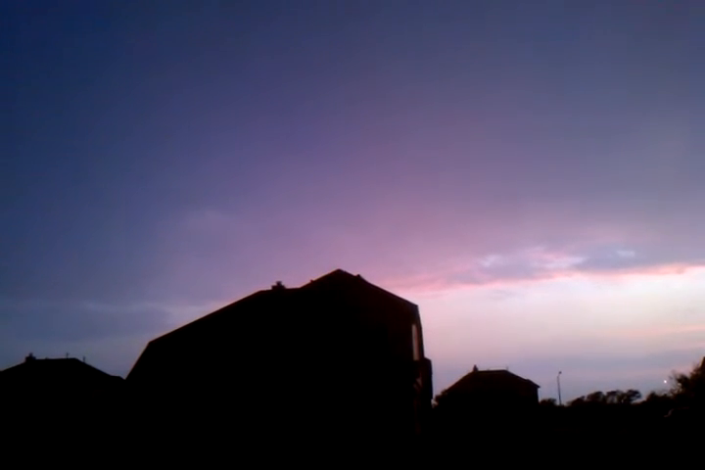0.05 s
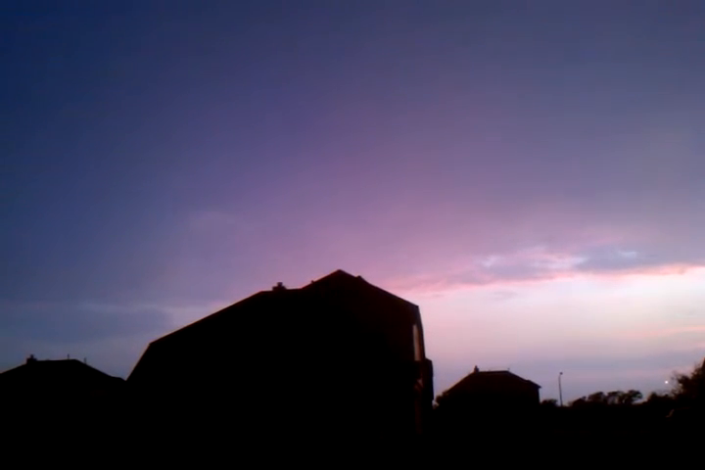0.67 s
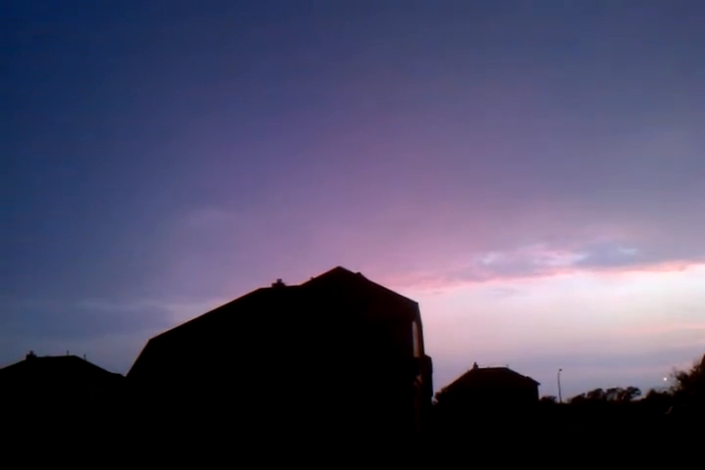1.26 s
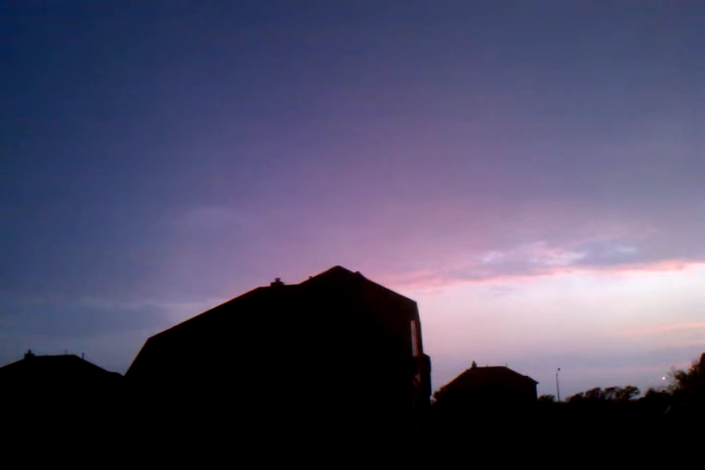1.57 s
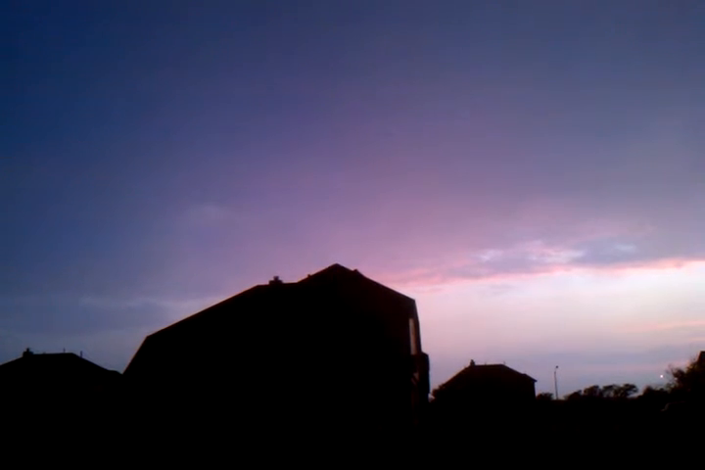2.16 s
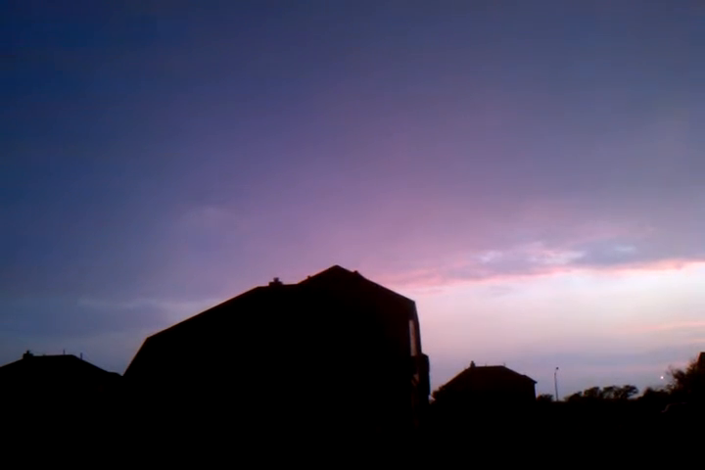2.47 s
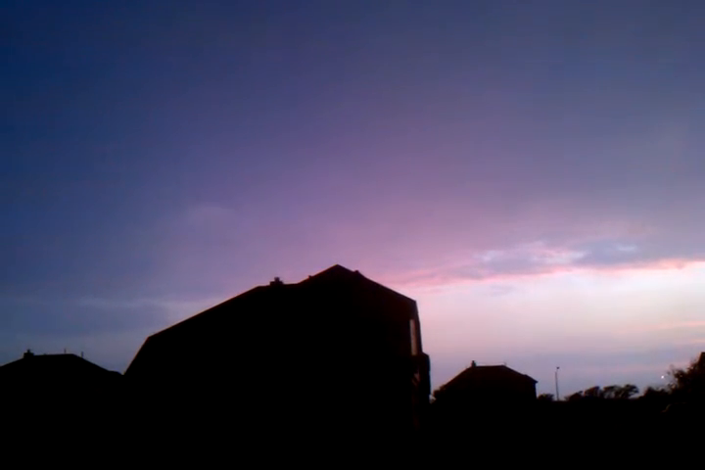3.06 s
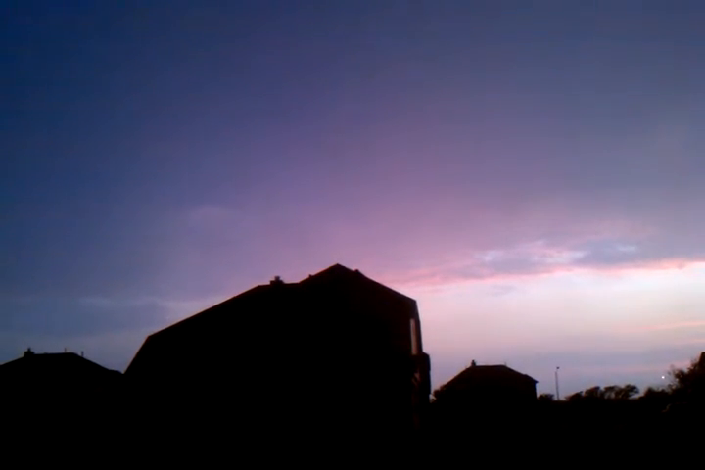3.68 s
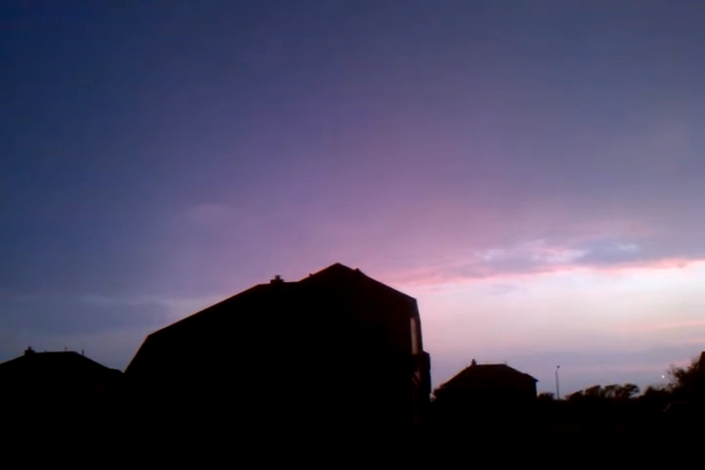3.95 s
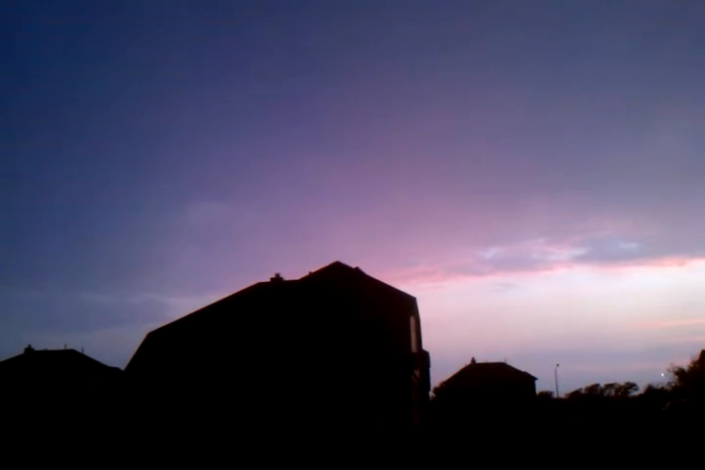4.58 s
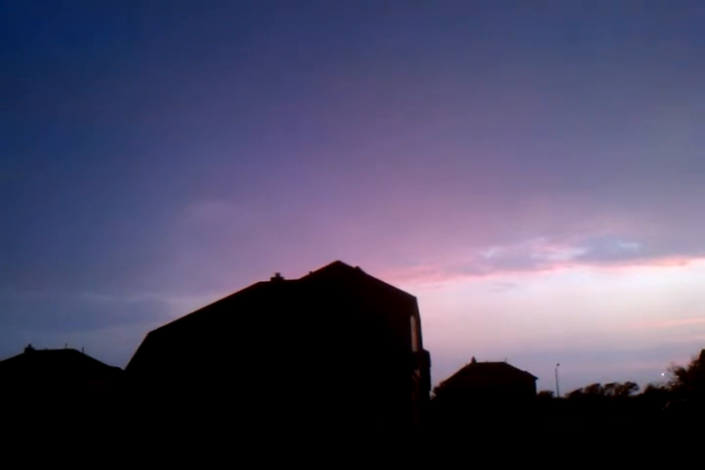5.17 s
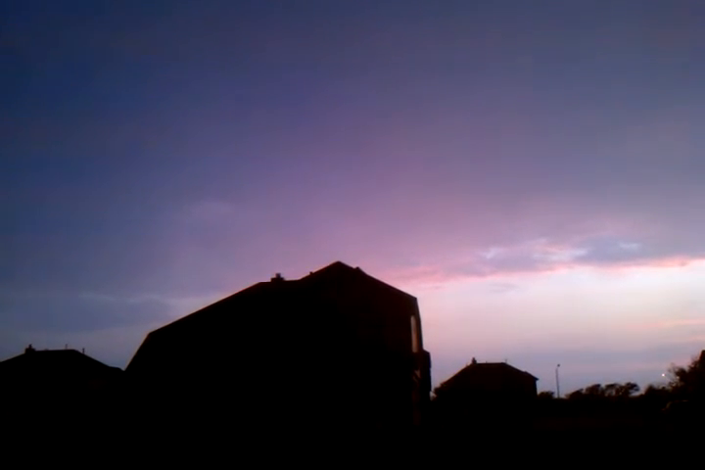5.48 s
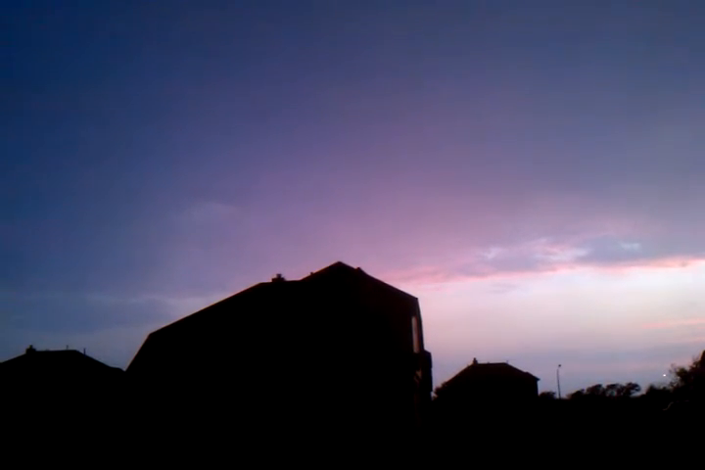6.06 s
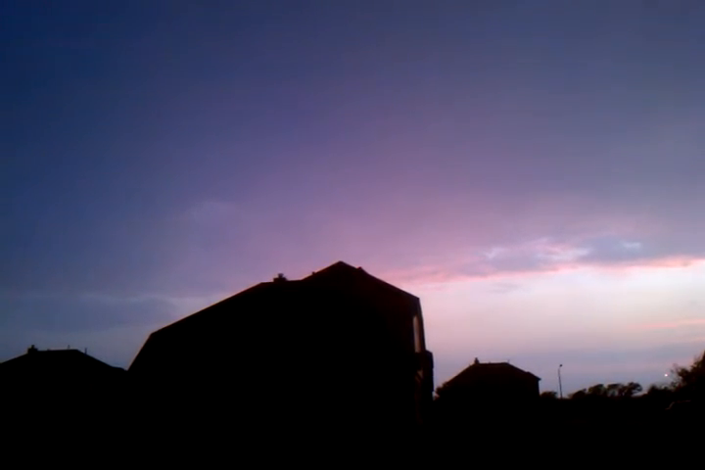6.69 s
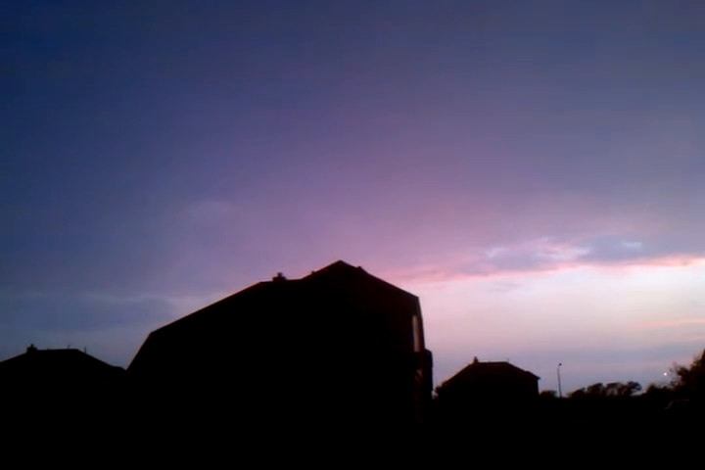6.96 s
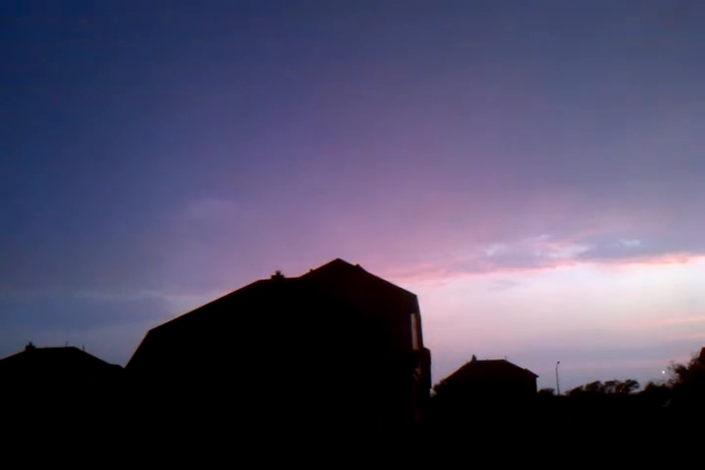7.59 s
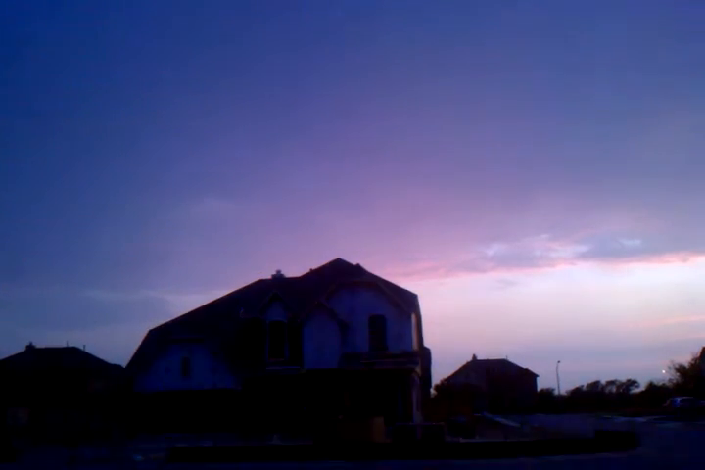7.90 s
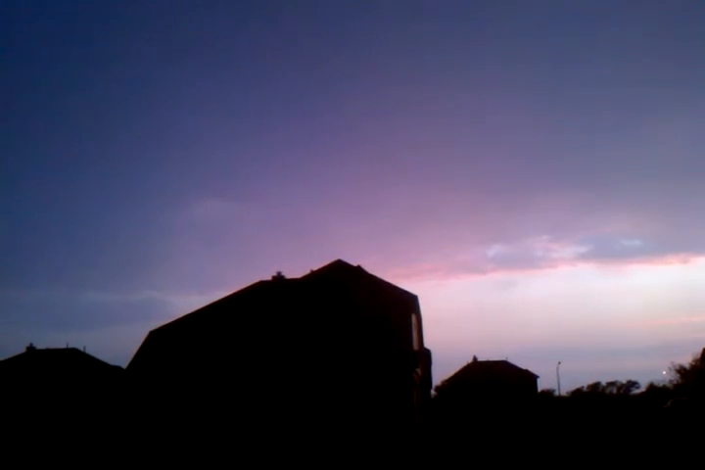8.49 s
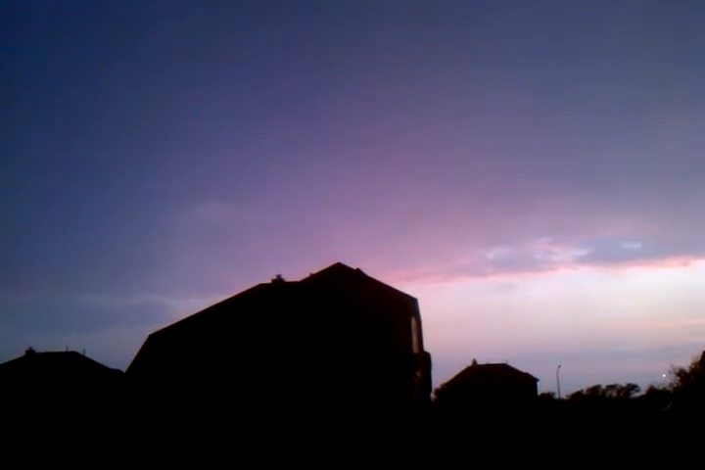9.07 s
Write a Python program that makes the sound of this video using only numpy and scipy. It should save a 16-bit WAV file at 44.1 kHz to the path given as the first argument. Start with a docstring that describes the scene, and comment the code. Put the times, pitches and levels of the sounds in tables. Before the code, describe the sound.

On one microphone beside a house, gentle rain hisses and patters above a low steady hum. Early on, a soft thump is followed by the sharp, briefly ringing smack of a big drop close by, the loudest sound. A low roll of far thunder follows and slowly dies away. The rain carries on, and toward the end distant traffic grows a little, with a short thin whine.

```python
"""Light rain at dusk, on one microphone at a house. From the start, far rain merges into a soft wash
and small drops tick nearby, over a steady hum and a low murmur of air and roads. Just after a soft
bump, at 2 s, a heavy drop smacks a surface close to the microphone and the walls answer. From 3.25 s
far thunder rolls once. Near the end the wash swells, with a brief faint whine, as of distant traffic."""
import sys
import numpy as np
from scipy import signal
from scipy.fft import rfft, irfft, next_fast_len
from scipy.io import wavfile
from scipy.ndimage import uniform_filter1d, map_coordinates

SR = 44100
rng = np.random.default_rng(int(sys.argv[2]) if len(sys.argv) > 2 else 0)


def output_pcm(signal):
    """Save a mono or channel-first signal as 16-bit PCM at the path in sys.argv[1].

    Samples are clipped to [-1, 1] before scaling.
    """
    pcm = np.clip(np.atleast_2d(signal).T, -1, 1) * 32767
    wavfile.write(sys.argv[1], SR, np.round(pcm).astype(np.int16))


N = 411894

# Spectra of the far rain, the near rain and the outdoor murmur: frequency_hz, level_db
WASH_SPECTRUM = [(200, -12), (350, 1), (560, -0.5), (800, 2), (1100, 1.5), (1600, 1), (2100, -2.5),
                 (2700, -9), (3600, -14), (7500, -22.5)]
PATTER_SPECTRUM = [(1000, -24.5), (2400, -4.5), (3300, -5.5), (3900, -1), (4600, 1.5), (5300, -0.5),
                   (6000, -2.5), (7200, -5.5), (7600, -22)]
MURMUR_SPECTRUM = [(20, 2.5), (30, -3.5), (42, -3.5), (70, 2), (95, -3), (120, -1.5), (150, -2), (195, -3),
                   (280, -0.5), (380, -13), (600, -26), (1500, -60)]
# Lines of the steady hum: pitch_hz, level_db, unsteadiness (0-1)
HUM_LINES = [(58.8, -48.8, .13), (114.3, -67, .4), (150, -67, .4), (173.5, -64.5, .45), (229, -68, .3),
             (239.9, -55.5, .06), (470, -64.5, .3), (479, -68, .4), (1411, -70, .5), (2115, -73, .4),
             (2470, -72, .2), (3881, -77.5, .3), (7210, -78.8, .15)]
# Swells of one more low hum line: crest_s, level_db, half_length_s
HUM_SWELLS = [(.45, -58.5, 0.58), (6.8, -55.5, .85)]
# The loudest drops near the microphone:
# start_s, level_db, pitch_hz, spread_octaves, t60_s, spit_gain, thud_relative_db, thud_hz
NEAR_DROPS = [(0.5317, -35.5, 4400, .3, 0.012, 0.2, 3.5, 1400), (1.3129, -37, 4660, .08, .012, .3, 1, 1410),
              (1.9265, -35.5, 5030, 0.11, .013, .3, -7, 1450), (2.3032, -42, 4610, .06, .013, .3, -7, 1430),
              (2.3815, -41, 4630, .06, .013, .3, 1, 1520), (3.4711, -38, 4160, .12, 0.01, .3, -9, 1400),
              (3.914, -33, 4410, .09, 0.011, .35, -6, 1400), (4.2328, -43, 4600, .1, .012, .15, 10, 1410),
              (4.4473, -37, 4950, .12, .012, 0.4, -6, 1450), (4.9102, -39.5, 4750, .1, 0.013, .3, 1, 1400),
              (5.0071, -41, 4930, .08, .013, 0.4, -4, 1450), (5.33, -38, 4940, .08, .013, .3, -1, 1450),
              (6.4104, -41.5, 6400, .1, .018, .3, -10, 1450), (6.4515, -35, 4460, .2, .012, 0.5, -4, 1400),
              (6.7499, -35, 5080, .03, 0.023, 0.1, -3, 2300),
              (6.8599, -41, 5130, .074, .013, .3, -10, 1450), (7.3368, -39, 4900, .08, .013, .3, -10, 1450),
              (8.8454, -35, 4670, .08, .013, .3, -8, 1450), (9.066, -42, 3850, .1, .012, .3, -7, 1430)]
# Spectra of the soft bump, the heavy drop's smack and its diffuse tail: frequency_hz, level_db
BUMP_SPECTRUM = [(20, -8), (45, 2), (85, -1), (110, -6), (170, -22), (400, -62)]
SMACK_SPECTRUM = [(150, -32), (380, -11), (600, -4), (900, -4), (1400, 1.5), (2100, -.5), (2700, -9),
                  (3400, -.5), (4400, -.5), (5200, 2), (6000, -1), (7000, -2), (7500, -7)]
TAIL_SPECTRUM = [(200, -7), (450, -13), (650, -6.5), (1100, -8), (1800, 1), (2700, -10), (4600, -7.5),
                 (7500, -13.5)]
# The heavy drop's direct path and first echoes off the walls: delay_s, level_db
WALL_PATHS = [(0, 0), (.0052, -5), (.0078, -11), (.0105, -14), (.0155, -9.5)]
# Modes of the surface it strikes: pitch_hz, level_db, t60_s
SURFACE_MODES = [(367, -14, 0.12), (632, -7, .072), (745, -12, 0.079), (955, -11.5, 0.11),
                 (1326, -6.5, .082), (1610, -8, 0.14), (1730, -14, 0.17), (1920, -10, 0.14),
                 (2060, -11, .17), (2420, -17, .07), (3430, -19, .16), (3620, -24, 0.14), (4640, -20, 0.19),
                 (5448, -16, 0.069)]
# Peals of far thunder: crest_s, level_db, rise_db_per_s, fall_db_per_s, growl_relative_db
THUNDER_PEALS = [(3.42, -47.5, 45, 15.5, -9), (3.62, -49, 37, 28.5, -6), (3.83, -43, 47, 43.5, -2),
                 (4.08, -49.5, 44, 30, -4), (4.38, -50, 27, 12.5, -8), (4.95, -53, 19, 13, -8.5),
                 (5.31, -53, 45, 29, -17), (5.62, -54.5, 22, 21.5, -9)]
# Spectra of the thunder's roll, its growl and the far traffic: frequency_hz, level_db
ROLL_SPECTRUM = [(25, -22), (45, -8.5), (85, 2.5), (120, 2), (150, -9.5), (178, -0.5), (235, -11),
                 (288, -3.5), (320, -12.5), (420, -15), (600, -27.5), (1200, -77)]
GROWL_SPECTRUM = [(90, -28), (150, -7), (182, 2), (235, -6), (288, -2), (325, -13), (450, -28), (900, -67)]
TRAFFIC_SPECTRUM = [(50, -12), (110, -7), (160, 1.5), (210, 0.5), (290, -7), (380, -14), (500, -6.5),
                    (700, -22), (1500, -49)]

TOP_HZ = 7450  # the recorder's upper limit


def amp(db):
    """Decibels to gain."""
    return 10 ** (np.asarray(db) / 20)


def unit(x):
    """Scale to rms 1."""
    return x / np.sqrt(np.mean(x ** 2) + 1e-20)


def clock():
    """The time of each sample in seconds."""
    return np.arange(N) / SR


def wobble(rate):
    """A smooth random curve, rate knots a second."""
    knots = rng.standard_normal(int(N * rate / SR) + 4)
    return map_coordinates(knots, [np.arange(N) * rate / SR])


def swell(crest_s, rise_db_per_s, fall_db_per_s):
    """An envelope that climbs to 1 at the crest and falls again."""
    t = clock() - crest_s
    return amp(np.minimum(rise_db_per_s * t, -fall_db_per_s * t))


def burst(start_s, t60):
    """An envelope that jumps to 1 and falls 60 dB in t60 seconds."""
    t = clock() - start_s
    return (t >= 0) * np.exp(-np.log(1000) * np.abs(t) / t60)


def filtered(x, response):
    """Filter x by a gain that is a function of frequency."""
    size = next_fast_len(N + SR // 2)
    return irfft(rfft(x, size) * response(np.fft.rfftfreq(size, 1 / SR)), size)[:N]


def coloured(x, spectrum):
    """Shape x by a spectrum on a log frequency axis, cut off above, at rms 1."""
    points_hz, points_db = np.transpose(spectrum)

    def response(hz):
        return amp(np.interp(np.log(hz + 1), np.log(points_hz), points_db)) * (hz < 1.1 * TOP_HZ)
    return unit(filtered(x, response))


def noise(spectrum):
    """Even coloured noise at rms 1."""
    return coloured(rng.standard_normal(N), spectrum)


def rush(spectrum, patchy_db):
    """Coloured noise at rms 1, with patches of random gain in frequency and time."""
    bins = signal.stft(rng.standard_normal(N), nperseg=512)[2]
    patches = uniform_filter1d(rng.standard_normal(bins.shape), size=7, axis=0)
    patches = unit(uniform_filter1d(patches, size=14, axis=1))
    patchy = signal.istft(bins * amp(patchy_db * patches), nperseg=512)[1][:N]
    return coloured(patchy, spectrum)


def impacts(starts_s, gains, hz, t60, spit):
    """Tiny impacts: each a damped ring mixed with a spit of noise."""
    t = np.arange(SR // 80) / SR
    ring = np.sin(2 * np.pi * hz[:, None] * t) + spit * rng.standard_normal((len(starts_s), len(t)))
    waves = gains[:, None] * ring * np.exp(-np.log(1000) * t / t60)
    places = (np.abs(starts_s)[:, None] * SR).astype(int) + np.arange(len(t))
    return np.bincount(places.ravel(), waves.ravel(), N)[:N]


def shower(count, pitch_hz, spread_oct, size_db, t60):
    """Drops land at random moments: many small, a few large."""
    when, size, tone = rng.random((count, 3)).T
    gains = amp(-size_db * np.log(np.maximum(size, 1 / 300)))
    hz = pitch_hz * 2 ** (spread_oct * (2 * tone - 1))
    return impacts(when * N / SR, gains, hz, t60, spit=0.86)


def rain():
    """Far rain merges into a wash that lifts as traffic nears; closer drops patter over a fine hiss."""
    lull = np.exp(-((clock() - 3.25) / 0.58) ** 2)
    wash_db = -49 - 0.5 * lull + 3 * traffic_nearness() + 0.13 * wobble(10)
    patter_db = -54.5 + 0.1059 * clock() + 0.53 * wobble(10)  # slowly gains strength
    wash = rush(WASH_SPECTRUM, patchy_db=1)
    far_shower = shower(count=2500, pitch_hz=1491, spread_oct=0.7, size_db=2, t60=0.028)
    wash += amp(-15) * coloured(far_shower, WASH_SPECTRUM)
    near_shower = shower(count=3000, pitch_hz=4720, spread_oct=0.5, size_db=2.5, t60=0.0076)
    patter = amp(-7) * coloured(near_shower, PATTER_SPECTRUM)
    hiss = amp(-3) * rush(PATTER_SPECTRUM, patchy_db=0.2)
    return amp(wash_db) * wash + amp(patter_db) * (patter + hiss)


def hum():
    """Steady lines, each with its own slow flutter; one more low line comes and goes."""
    t = clock()
    lines = np.zeros(N)
    for hz, db, unsteady in HUM_LINES:
        flutter = 1 - unsteady + unsteady * (wobble(9) + 1j * wobble(9)) / 2
        tone = np.exp(2j * np.pi * (hz * t + rng.random()))
        lines += amp(db) * unit(np.real(flutter * tone))
    swells = sum(amp(db) * np.exp(-((t - s) / half_s) ** 2) for s, db, half_s in HUM_SWELLS)
    return lines + swells * unit(np.sin(2 * np.pi * 114.5 * t))


def murmur():
    """Air and far roads lay a steady low rumble under the rain."""
    return amp(-52.5) * rush(MURMUR_SPECTRUM, patchy_db=0.5)


def splashes(rows, shatter_s=0.001):
    """Each drop breaks into three ticking droplets, over a duller thud with one short overtone."""
    start_s, db, pitch_hz, spread_oct, t60, spit, thud_db, thud_hz = np.transpose(rows)
    t60, spit = t60[:, None], spit[:, None]
    ticks = np.zeros(N)
    for side in (-1, 0, 1):  # the two side droplets land later and weaker
        lands_s = start_s + abs(side) * shatter_s * rng.random(len(start_s))
        hz = pitch_hz * 2 ** (side * spread_oct)
        ticks += impacts(lands_s, amp(db - 4 - 6 * abs(side)), hz, t60, spit)
    thuds = impacts(start_s, amp(db + thud_db), thud_hz, t60=0.014, spit=spit)
    overtones = impacts(start_s, amp(db + thud_db - 6), 1.7 * thud_hz, t60=0.011, spit=spit)
    return ticks + thuds + overtones


def near_drops(faint_count=9, scatter_oct=0.07):
    """Distinct drops land near the microphone, with fainter ones at random among them."""
    tunings = 2 ** (scatter_oct * rng.standard_normal(faint_count))
    starts_s = rng.random(faint_count) * N / SR
    faint = [(start_s, -44, 4550 * tuning, 0.1, 0.014, 0.35, -6, 1420 * tuning)  # as in NEAR_DROPS
             for start_s, tuning in zip(starts_s, tunings)]
    return splashes(NEAR_DROPS) + splashes(faint)


def bump():
    """A soft, low bump shortly before the heavy drop."""
    return amp(-44.5) * swell(crest_s=1.865, rise_db_per_s=350, fall_db_per_s=131) * noise(BUMP_SPECTRUM)


def heavy_drop(start_s=2.003):
    """A heavy drop smacks and rings a surface close by; the walls return it, then a diffuse tail."""
    arrivals = sum(amp(db) * burst(start_s + delay_s, t60=0.012) for delay_s, db in WALL_PATHS)
    smack = arrivals * unit(np.tanh(noise(SMACK_SPECTRUM)))  # a dense spray of even strength
    t = clock() - start_s
    ring = np.zeros(N)
    for hz, db, t60 in SURFACE_MODES:
        envelope = burst(start_s, t60) - burst(start_s, t60=0.007)  # builds over a few milliseconds
        ring += amp(db + rng.normal(0, 1)) * envelope * np.sin(2 * np.pi * (hz * t + rng.random()))
    early = burst(start_s + 0.0055, t60=0.082)
    late = amp(-7) * burst(start_s + 0.02, t60=0.52)
    tail = (early + late) * noise(TAIL_SPECTRUM)
    return amp(-22) * smack + amp(-27.5) * ring + amp(-34.5) * tail


def thunder(start_s=3.25, attack_s=0.13):
    """Distance leaves only low, growling peals that overlap, and their lingering echo off the land."""
    onset = np.clip((clock() - start_s) / attack_s, 0, 1)
    peal_power, growl_power = np.zeros((2, N))
    for crest_s, db, rise, fall, growl_db in THUNDER_PEALS:
        peal = amp(db) * swell(crest_s, rise, fall)
        peal_power += peal ** 2
        growl_power += (amp(growl_db) * peal) ** 2
    echo = amp(-52) * swell(crest_s=4.3, rise_db_per_s=16, fall_db_per_s=3.5)
    roll = np.sqrt(peal_power + echo ** 2) * noise(ROLL_SPECTRUM)
    growl = np.sqrt(growl_power) * noise(GROWL_SPECTRUM)
    return onset * (roll + growl)


def traffic_nearness(nearest_s=9.17, approach_s=0.78):
    """How near the distant traffic is, from 0 to 1."""
    return 1 / (1 + ((clock() - nearest_s) / approach_s) ** 2)


def traffic():
    """The low drone of far traffic grows as it draws nearer."""
    return amp(-53) * traffic_nearness() * noise(TRAFFIC_SPECTRUM)


def whine(from_hz=618, to_hz=668):
    """A thin far whine glides up and fades, blurred by its many paths through the air."""
    glide = (1 + np.tanh((clock() - 8.22) / 0.07)) / 2
    hz = from_hz + (to_hz - from_hz) * glide
    phase = 2 * np.pi * np.cumsum(hz) / SR
    paths = 1 + 0.48 * (wobble(65) + 1j * wobble(65))
    envelope = amp(-50.2) * swell(crest_s=8.28, rise_db_per_s=64, fall_db_per_s=52)
    return envelope * unit(np.real(paths * np.exp(1j * phase)))


def scene():
    """Near and far, everything reaches one microphone at the house."""
    bed = rain() + hum() + murmur()
    return (bed + near_drops() + bump() + heavy_drop() + thunder() + traffic() + whine())[None]


def record(dry):
    """A narrow-band mono recorder with a steep upper limit."""
    return filtered(dry[0], lambda hz: 1 / np.sqrt(1 + (hz / TOP_HZ) ** 220))[None]


dry = scene()
out = record(dry)
output_pcm(out)
```